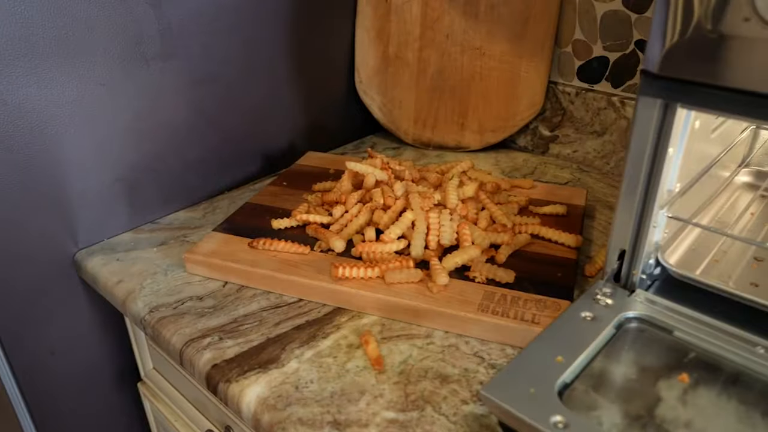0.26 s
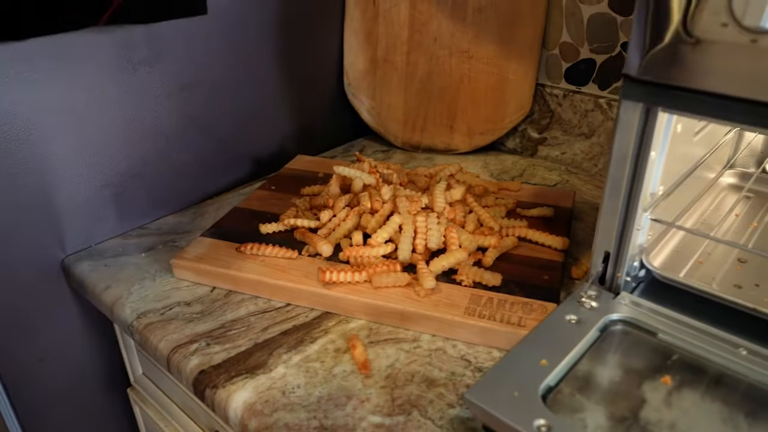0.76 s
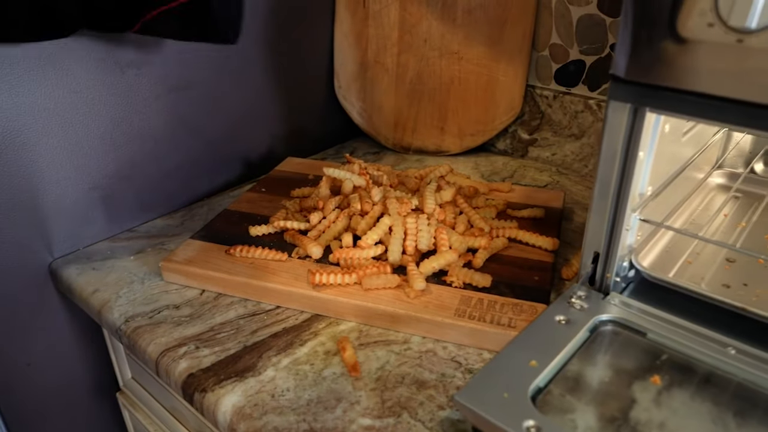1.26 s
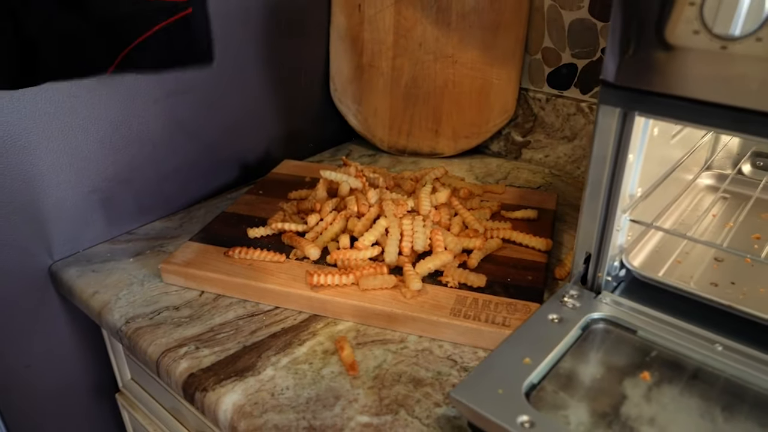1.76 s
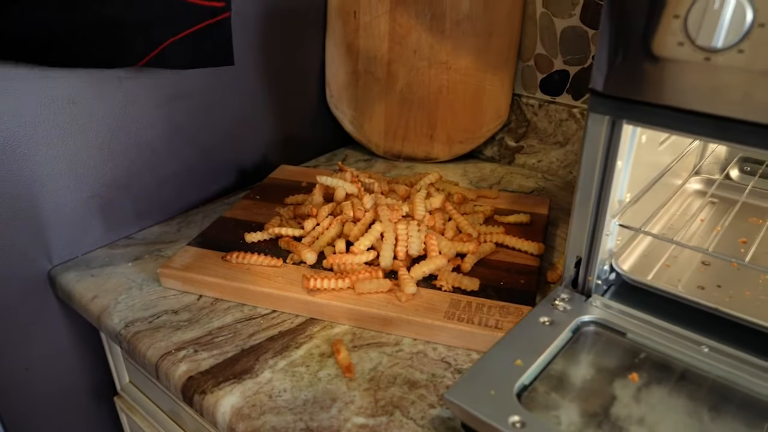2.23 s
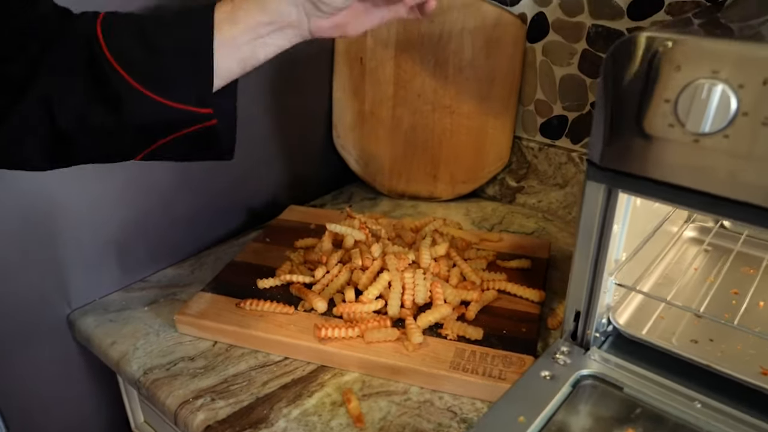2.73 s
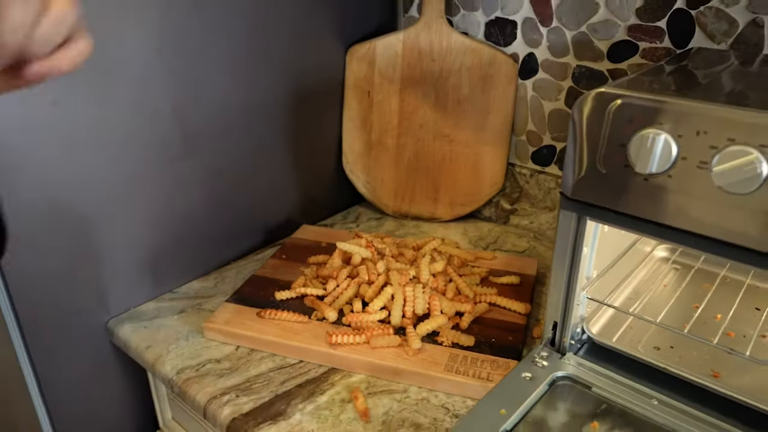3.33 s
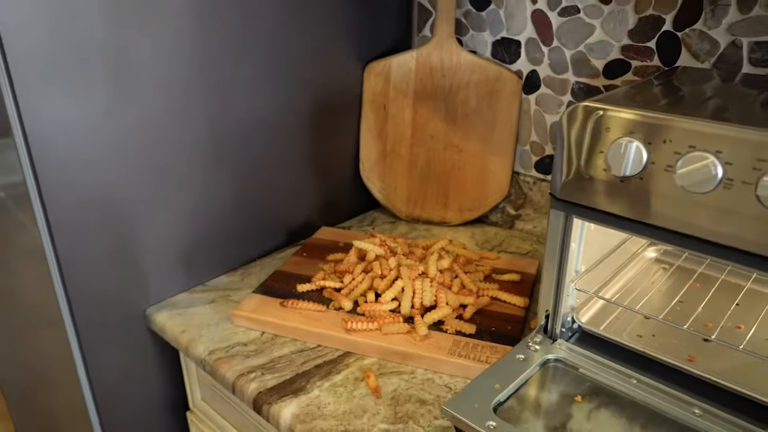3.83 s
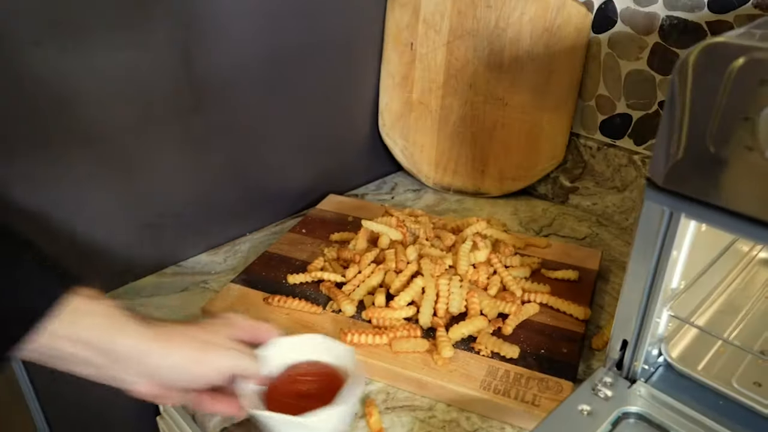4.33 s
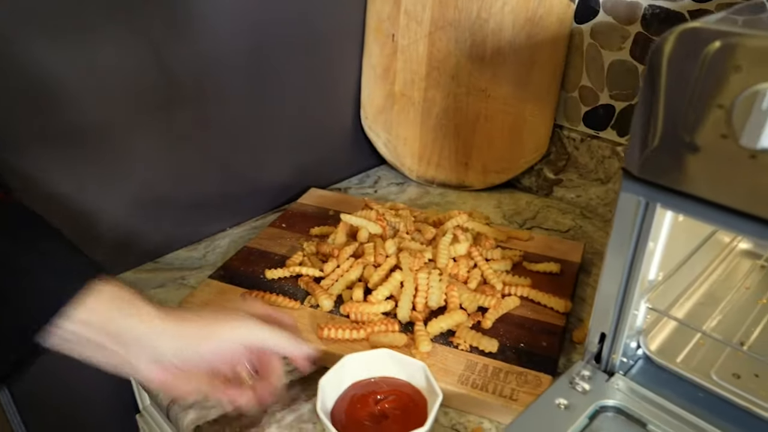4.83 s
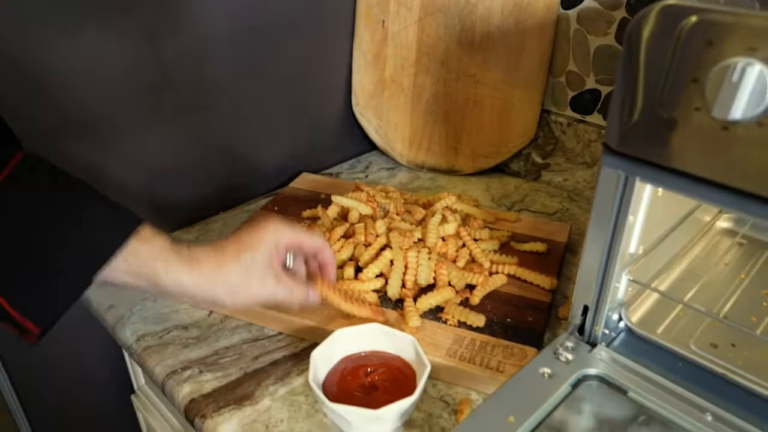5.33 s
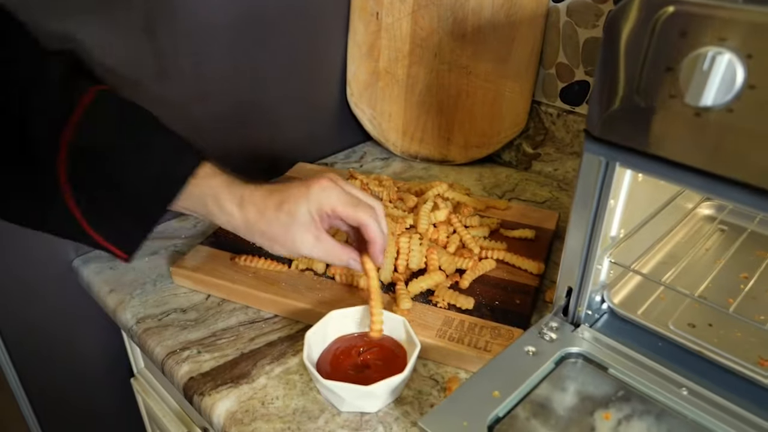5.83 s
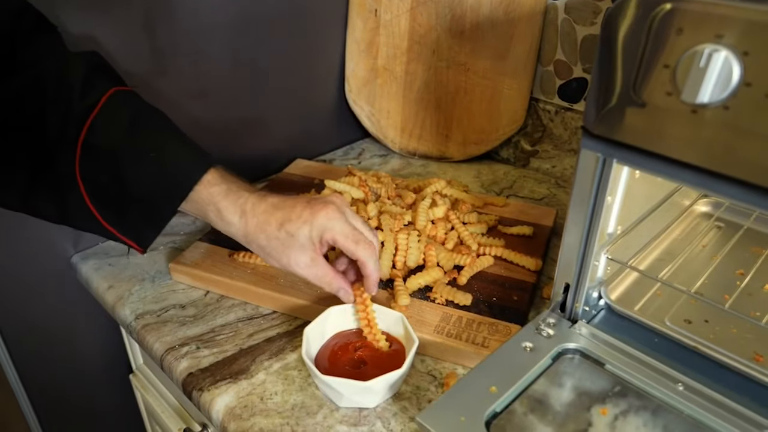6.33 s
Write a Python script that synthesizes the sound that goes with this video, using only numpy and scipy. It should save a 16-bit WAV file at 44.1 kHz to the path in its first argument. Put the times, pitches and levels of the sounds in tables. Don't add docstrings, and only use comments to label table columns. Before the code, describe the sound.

Ten brisk, crackling grinder twists with lighter returns, a short rustling pause, a hard ceramic knock with settling rattle, then tiny dry ticks.

```python
import sys
import numpy as np
from scipy import signal
from scipy.fft import rfft, irfft, next_fast_len
from scipy.io import wavfile
from scipy.ndimage import uniform_filter1d

SR = 44100
rng = np.random.default_rng(int(sys.argv[2]) if len(sys.argv) > 2 else 0)


def digitize_waveform(pressure):
    field = np.atleast_2d(pressure).T
    bounded = np.clip(field, -1, 1)
    quanta = np.round(bounded * 32767).astype(np.int16)
    wavfile.write(sys.argv[1], SR, quanta)


def undo_db(level):
    steps = np.asarray(level, float) / 20
    return 10 ** steps


N = 289631


def rms_one(x):
    return x / np.sqrt(np.mean(x ** 2) + 1e-20)


def at_hz(points, hz):
    point_hz, point_db = np.array(points).T
    return np.interp(np.log(hz), np.log(point_hz), point_db)


def drift(rate_hz):
    pole = np.exp(-80 * np.pi * rate_hz / SR)
    chance = rng.standard_normal(N // 40 + 2002)
    slow = signal.lfilter([1], [1, -2 * pole, pole ** 2], chance)[2000:]
    return np.interp(np.arange(N) / 40, np.arange(len(slow)), rms_one(slow))


def passband(x, low_hz, high_hz):
    sos = signal.butter(4, [low_hz, min(high_hz, 20000)], "band", fs=SR, output="sos")
    return signal.sosfilt(sos, x)


def ring(clicks, hz, t60):
    r, w = undo_db(-60 / (t60 * SR)), 2 * np.pi * hz / SR
    return signal.lfilter([0, np.sin(w)], [1, -2 * r * np.cos(w), r * r], clicks + 1e-18)


def in_time(gestures):
    t = np.arange(N) / SR
    power, colours = np.full(N, 1e-14), np.zeros((2, N))
    for s, level_db, *colour in map(np.transpose, gestures):
        on = slice(*np.searchsorted(t, s[[0, -1]]))
        part = undo_db(2 * np.interp(t[on], s, level_db))
        power[on] += part
        colours[:, on] += [part * np.interp(t[on], s, c) for c in colour]
    return uniform_filter1d(np.sqrt(power), size=60), *colours / power


def grains(gestures, spectrum, per_s, spread_db, cycles, clump_db, patch_db, usual_db):
    level, bright_db, deep_db = in_time(gestures)
    load = np.clip(level / undo_db(-30), .06, 1) ** .85
    sizes = undo_db(spread_db * np.minimum(rng.exponential(1, N), 4)) * rng.choice([-1, 1], N)
    odds = per_s * load * undo_db(clump_db * drift(90)) / SR
    breaks = sizes / np.sqrt(load) * (rng.random(N) < odds)
    pitches, dealt = np.geomspace(1000, 15500, 36), rng.integers(0, 7, N)
    grips = [undo_db(patch_db * drift(26.0)) for _ in range(5)]
    parts = np.zeros((3, N))
    for k, hz in enumerate(pitches):
        rung = rms_one(ring(breaks * (dealt == k % 7), hz, cycles / hz))
        register = int(hz > 2500) + int(hz > 5300)
        parts[register] += rung * undo_db(at_hz(spectrum, hz)) * np.sqrt(hz) * grips[k % 5]
    deep, middle, bright = parts / np.std(parts[0] + parts[1])
    return level * (deep * undo_db(deep_db + 3.5) + middle + bright * undo_db(bright_db - usual_db))


def cracks(events, trim_db, spit_t60):
    out = np.zeros(N + 1000)
    t = np.arange(1000) / SR
    chances = rng.standard_normal((len(events), 1000))
    for (s, peak_db, hz, bright_db), chance in zip(events, chances):
        burst = chance * undo_db(-60 * t / .006)
        body = ring(burst, hz, .012)
        body = body + .4 * ring(burst, hz * .72, .007) + .6 * ring(burst, hz * 1.4, .006)
        spit = np.diff(chance, prepend=0) * undo_db(bright_db + 4.5 - 60 * t / spit_t60)
        at = round(s * SR)
        out[at:at + 1000] += undo_db(peak_db + trim_db) * (body / np.abs(body).max() + spit)
    return out[:N]


def background():
    # (frequency [Hz], density [dB per Hz])
    floor = [(38, -5.5), (50, -11), (95, -5.5), (150, -17), (300, -15), (600, -21), (1100, -20),
             (2000, -24), (3400, -24), (4800, -33), (7000, -41), (11000, -46.5), (12500, -49.5),
             (14000, -64.5), (16000, -70)]
    # (frequency [Hz], left minus right [dB])
    port_lean = [(60, 26), (110, 8.5), (200, -0.5), (380, 4), (700, 2), (1290, 0.5), (2380, -1.5),
                 (4400, 3.5), (8120, -0.5), (15000, 7)]
    # (frequency [Hz], likeness [0-1])
    coherence = [(60, 0.94), (180, 0.81), (550, 0.83), (1650, 0.99), (4970, 1), (15000, 0.14)]
    # (time [s], level [dB])
    rumble = [(0.0, -56), (0.56, -64), (1.66, -55), (2.94, -63.5), (4.55, -58), (4.75, -63), (6.47, -61.5),
              (6.56, -67)]
    # (time [s], level [dB])
    hiss = [(0, 2.5), (1.5, 5.5), (3, 1.5), (4.3, 3), (4.7, -1), (5, -0.5), (6.57, 0)]
    hum_hz, hum_width_hz = 241.3, 2.6
    t = np.arange(N) / SR
    rumble_db = np.interp(t, *np.transpose(rumble)) + 62
    hiss_db = np.interp(t, *np.transpose(hiss))
    white = rng.standard_normal((2, 2, N + SR))
    opposed = np.array([[1], [-1]])
    out, bounds = 0, np.r_[16 * 2 ** np.arange(0, 9.6, .5), 12900, 16400]
    for k, (low, high) in enumerate(zip(bounds, bounds[1:])):
        sos = signal.butter(2, [low, high], "band", fs=SR, output="sos")
        mid, side = signal.sosfilt(sos, white[k % 2])[:, SR:]
        hz = np.sqrt(low * high)
        alike = np.clip(at_hz(coherence, hz), 0, 1)
        lean = undo_db(at_hz(port_lean, hz) / 2 * opposed)
        band_db = at_hz(floor, hz) + 1.5 * drift(3.0) + rumble_db * (50 < hz < 140)
        gain = undo_db(band_db + hiss_db * (hz > 4000) * (1 + 0.87 * (hz > 13000)))
        out = out + gain * lean * (np.sqrt(1 + alike) * mid + np.sqrt(1 - alike) * side * opposed)
    flutter = ring(white[0, 0], hum_hz, np.log(1000) / np.pi / hum_width_hz)[SR:]
    hum = rms_one(flutter) + 3.3 * np.sin(2 * np.pi * hum_hz * t)
    return undo_db(-53) * rms_one(out) + undo_db(-67) * rms_one(hum) * undo_db(.6 * opposed)


def kitchen(x):
    t60_s, wall_cut_hz = 0.53, 2070
    size = next_fast_len(N + SR)
    w = 2 * np.pi * np.arange(size // 2 + 1) / size
    dull = 1 / (1 + 1j * w * SR / (2 * np.pi * wall_cut_hz)) ** 0.18
    echoes = 0
    for k, lag in enumerate(rng.uniform(0.0073, .036, 10) * SR):
        trip = undo_db(-60 * lag / SR / t60_s) * dull * np.exp(-1j * w * round(lag))
        echoes = echoes + trip / (1 - trip) * (-1) ** k
    return irfft(rfft(x, size) * echoes, size)[:N]


def rustle(rows):
    shape = np.array([1, .38, 0, .38, 1])
    drop_db = shape * [-19.5, -19.5, 0, -23, -23]
    return [np.c_[s + np.cumsum([0, swell / 2, swell / 2, fade / 2, fade / 2]),
                  db + drop_db, bright_db - 7.5 * shape, np.full(5, -0.5)]
            for s, swell, fade, db, bright_db in rows]


def hand():
    # (time [s], swell [s], fade [s], level [dB], brightness [dB])
    rustles = [(0.0, 0.0033, 0.13, -53.5, -15), (0.114, .1, .02, -61, -27),
               (0.24, 0.051, 0.051, -46.5, -14), (0.38, .035, 0.047, -45, -20),
               (3.02, 0.073, 0.28, -58, -21), (3.3, 0.054, .06, -49.5, -16), (3.49, 0.024, 0.11, -49, 0),
               (3.665, 0.021, 0.083, -53, -12), (4.02, 0.03, 0.076, -44.5, 3),
               (4.1, 0.029, 0.11, -48.5, -18), (4.45, 0.082, 0.24, -63.5, 0.5),
               (5.17, 0.027, .06, -61.5, -9), (5.37, 0.06, 0.016, -53, 1), (5.45, .017, 0.028, -61, 3),
               (5.69, .012, .07, -62, -14), (5.77, 0.019, .05, -58, -26), (6.02, 0.13, .11, -50.5, -26),
               (6.41, 0.031, .07, -71, -8)]
    # (frequency [Hz], density [dB per Hz])
    cloth = [(900, -3.5), (1500, -14), (2400, -3), (3400, 6.5), (4600, -2), (6000, -6), (9000, -25),
             (15500, -28)]
    # (time [s], peak [dB], pitch [Hz], brightness [dB])
    ticks = [
        (5.2, -48.5, 3150, -28),
        (5.4058, -49, 3020, -23),
        (5.4255, -38, 3640, -23),
        (5.466, -49, 2100, -11),
        (5.6184, -33, 2000, -23),
        (5.6195, -35, 2460, -24),
        (5.7832, -52, 3630, -37.5),
        (5.7944, -49, 3640, -30),
    ]
    sleeve = grains(rustle(rustles), cloth, per_s=170000, spread_db=1.5, cycles=19.4,
                    clump_db=0.5, patch_db=1.4, usual_db=-6.0)
    return passband(sleeve + cracks(ticks, trim_db=-0.5, spit_t60=0.0089), 1120, 13500)


def bowl():
    # (time [s], blow [dB], hardness [Hz], thud [dB], free ring [dB])
    landings = [
        (4.3175, -10.5, 5930, -32.5, -23),
        (4.404, -23.5, 4400, -38.5, -37),
        (4.478, -31, 4540, -33, -29),
        (4.488, -36.5, 3500, -42, -26.5),
        (4.508, -45, 3440, -44.5, -37),
        (4.541, -47.5, 3000, -47, -40),
        (4.574, -47, 3000, -53, -48),
        (4.659, -59, 3000, -61, -47),
        (5.424, -56.5, 11900, -74, -54),
    ]
    # (frequency [Hz], level [dB], t60 [s])
    seated = [(1537, -2, 0.031), (1770, 2, 0.033), (2515, -1.5, 0.029), (2970, -6, 0.043),
              (3300, -14.5, 0.045), (3440, -0.5, 0.023), (4124, 1, 0.042), (4690, -3, 0.024),
              (5270, -3.5, 0.016), (5940, -5.5, 0.013), (6520, -8.5, 0.036), (6770, -10.5, 0.04)]
    # (frequency [Hz], level [dB], t60 [s])
    rim = [(1700, -28, .07), (1798, -0.5, 0.094), (1894, 0.5, 0.17), (1894, -12, 0.39), (2420, -12, .08),
           (4120, -16, 0.28), (7170, -6, .045)]
    # (frequency [Hz], level [dB], t60 [s])
    counter = [(93, 0.5, 0.035), (169, -1, 0.03), (450, 2.5, 0.016), (590, -6, 0.083), (772, -1.5, 0.043),
               (1003, 0.5, 0.021)]
    blows, rims = np.zeros((len(seated), N)), np.zeros((len(rim), N))
    thuds, chatter = np.zeros(N), np.zeros(N + 6000)
    t = np.arange(6000) / SR
    chatter_decay = undo_db(-60 * t / 0.049) + undo_db(-8.5 - 60 * t / 0.34)

    def softness(modes, hard_hz):
        return (1 + (np.array(modes)[:, 0] / hard_hz) ** 2) ** -1.5

    draws = rng.standard_normal((len(landings), 6020))
    for (s, blow_db, hard_hz, thud_db, rim_db), chance in zip(landings, draws):
        at = round(s * SR)
        uneven_db = 1.5 * chance[6000:6000 + len(seated)]
        blows[:, at] = undo_db(blow_db + uneven_db) * softness(seated, hard_hz)
        rims[:, at] = undo_db(rim_db) * softness(rim, hard_hz)
        chatter[at:at + 6000] += chance[:6000] * undo_db(-3 + 0.84 * blow_db) * chatter_decay
        thuds[at] = undo_db(thud_db)
    struck = zip([*blows, *rims], seated + rim)
    rung = sum(undo_db(db) * ring(hit, hz, t60) * (-1) ** k for k, (hit, (hz, db, t60)) in enumerate(struck))
    knock = sum(undo_db(db) * ring(thuds, hz, t60) * (-1) ** k for k, (hz, db, t60) in enumerate(counter))
    contacts = [(s, blow_db, 9000, -6) for s, blow_db, *_ in landings]
    spit = passband(cracks(contacts, trim_db=-28.0, spit_t60=0.011), 3100, 15000)
    return passband(rung, 770, 7700) + passband(chatter[:N], 1220, 3670) + knock + spit


def twist(rows, colour, under_db, sag_db, release_s, drop_db):
    finer_db_per_s, even_s = 0.5, 1.69
    return [np.c_[s + np.cumsum([0, rise, max(length - rise, .002), release_s]),
                  [bite_db + under_db, db, db + sag_db, db + sag_db + drop_db],
                  colour + np.array([finer_db_per_s * (s - even_s), 0])]
            for s, rise, length, db, bite_db in rows]


def mill():
    # (time [s], rise [s], length [s], crunch [dB], first bite peak [dB])
    forward = [
        (0.309, .009, 0.041, -38.5, -39),
        (0.502, 0.02, 0.093, -27.5, -24.5),
        (0.881, .028, 0.043, -23, -15.5),
        (1.183, 0.027, 0.059, -26.5, -23),
        (1.492, 0.024, 0.051, -23.5, -19.5),
        (1.777, 0.028, 0.039, -22.5, -18.5),
        (2.059, 0.023, 0.068, -26, -27),
        (2.356, 0.019, 0.062, -29, -24.5),
        (2.64, .035, 0.063, -27, -28),
        (2.931, 0.026, 0.06, -26.5, -26.5),
    ]
    # (time [s], rise [s], length [s], crunch [dB], first bite peak [dB])
    returns = [(0.23, 0.0035, 0.011, -45.5, -29), (0.656, .048, .11, -43, -32.5),
               (0.86, 0.014, 0.018, -47.5, -43), (1.013, 0.0055, 0.057, -39.5, -24),
               (1.095, .004, 0.0053, -40.5, -30.5), (1.33, 0.019, .055, -40, -24),
               (1.463, 0.013, 0.021, -47, -39.5), (1.627, 0.018, 0.044, -38.5, -24.5),
               (1.913, 0.05, 0.065, -43, -27), (2.215, 0.026, 0.06, -42, -21),
               (2.497, 0.068, 0.066, -37, -25), (2.778, 0.041, 0.076, -43.5, -26)]
    # (brightness [dB], depth [dB])
    forward_colour = [(-9, -5), (-8.5, -3.5), (-9.5, -2.5), (-23, -20)]
    # (brightness [dB], depth [dB])
    return_colour = [(-8.5, -5), (-8.5, -2.5), (-8, -3.5), (-33, -22)]
    # (time [s], peak [dB], pitch [Hz], brightness [dB])
    snaps = [(0.258, -26.5, 1650, -37), (0.274, -31, 4250, -17), (0.3144, -13, 3510, -23),
             (0.676, -34, 1960, -30), (0.692, -21.5, 2840, -12), (1.0278, -19, 2070, -10.5),
             (1.071, -19, 2960, -20), (1.1972, -9, 2950, -16.5), (1.2117, -19, 3740, -33),
             (1.3458, -24.5, 2530, -16), (1.3962, -32, 3500, -19.5), (1.5484, -32, 3100, 1),
             (1.6412, -15.5, 2900, -19), (1.6798, -19, 2130, -17), (1.9244, -21.5, 1750, -12),
             (1.965, -27, 2520, -10.5), (2.0778, -10.5, 1670, -23), (2.121, -25, 3030, -8),
             (2.2475, -18, 1920, -22), (2.272, -27, 3000, -12), (2.366, -20, 2430, -19),
             (2.422, -24, 3220, -9), (2.52, -22, 2330, -10), (2.5501, -20, 2360, -22),
             (2.565, -31, 3100, -10), (2.646, -28, 3800, -2), (2.6552, -15.5, 2290, -25),
             (2.807, -18.5, 3080, -23), (2.9332, -12, 3300, -25), (2.9517, -10, 3300, -25)]
    # (time [s], peak [dB], pitch [Hz], brightness [dB])
    stops = [
        (0.7791, -26, 3080, -16),
        (1.1025, -29, 3480, -17),
        (1.424, -36.5, 3270, -8),
        (1.7054, -38, 2470, -6),
        (1.9801, -25.5, 3150, -5.5),
        (2.586, -24.5, 3100, -5),
        (2.857, -28, 3320, -6.5),
    ]
    # (frequency [Hz], density [dB per Hz])
    burr = [(950, -3), (1250, -25.5), (1600, -3), (1950, -3), (2270, 2.5), (2600, -3), (2950, -1.5),
            (3300, 3.5), (4100, -4.5), (4900, -7.5), (7000, -7.5), (10500, -13), (12500, -16), (15500, -1)]
    twists = twist(forward, forward_colour, under_db=-13.5, sag_db=-3.5, release_s=0.0572, drop_db=-32.5)
    twists += twist(returns, return_colour, under_db=-19, sag_db=-1, release_s=0.0773, drop_db=-28)
    bites = [(row[0] + 0.001423, row[-1], 3100, -25) for row in forward + returns]
    crunch = grains(twists, burr, per_s=5000, spread_db=0.5, cycles=31.4,
                    clump_db=4.0, patch_db=3.5, usual_db=-7.5)
    snapping = cracks(bites + snaps + stops, trim_db=-6.5, spit_t60=0.027)
    return passband(undo_db(-2.0) * crunch + snapping, 1360, 11100)


def scene():
    near = mill() + hand() + bowl()
    return near + undo_db(-25.5) * kitchen(near) + background()


def top_cut(x):
    return signal.sosfilt(signal.butter(12, 16630, fs=SR, output="sos"), x)


def record(dry):
    rounded = 0.61 * np.tanh(dry / 0.61)
    mix = signal.sosfilt(signal.cheby2(12, 60, 16650, fs=SR, output="sos"), rounded)
    return top_cut(mix)


dry = scene()
out = record(dry)
digitize_waveform(out)
```